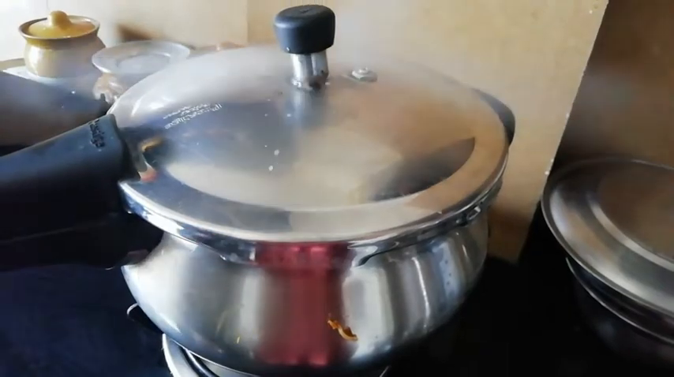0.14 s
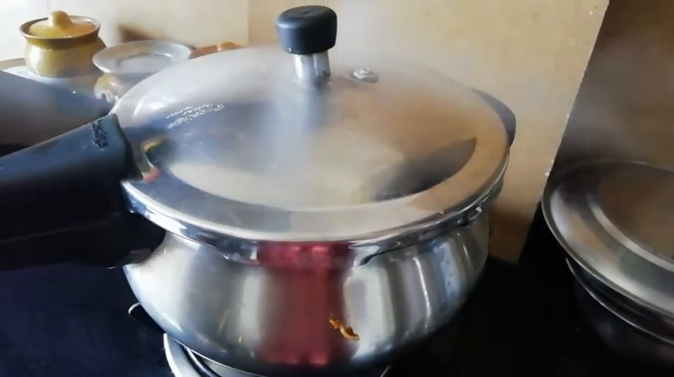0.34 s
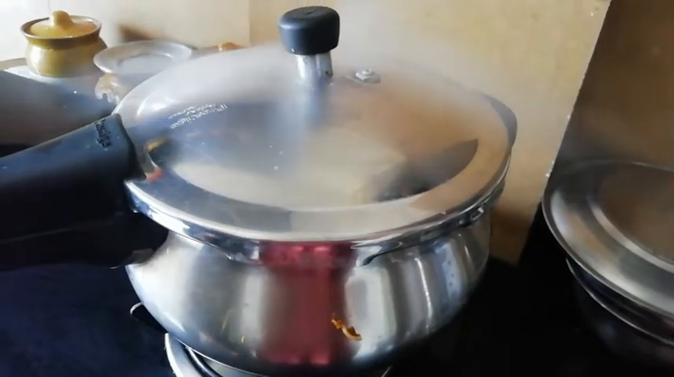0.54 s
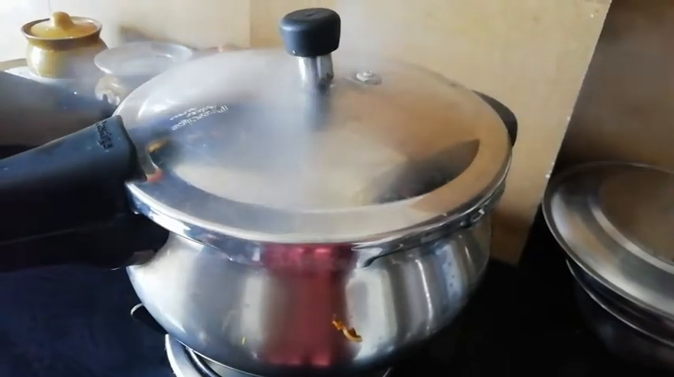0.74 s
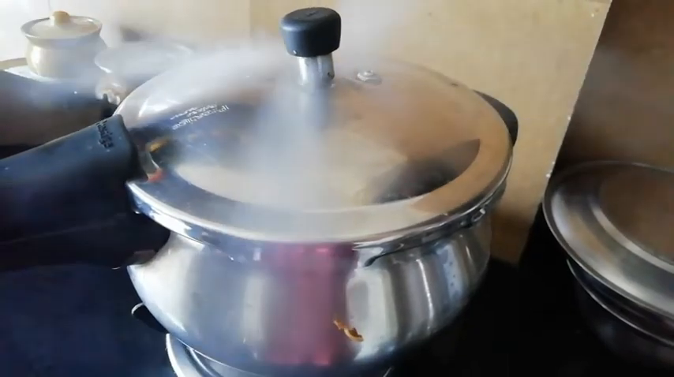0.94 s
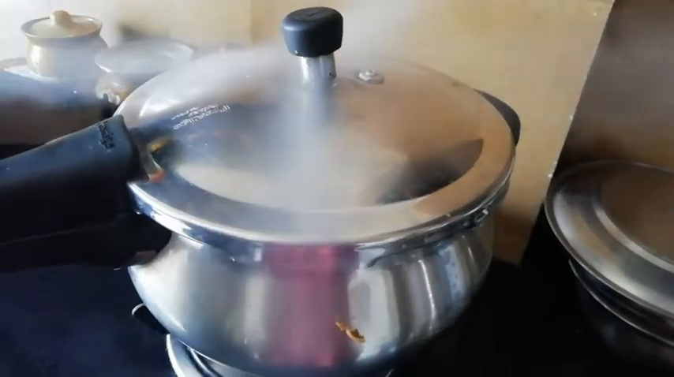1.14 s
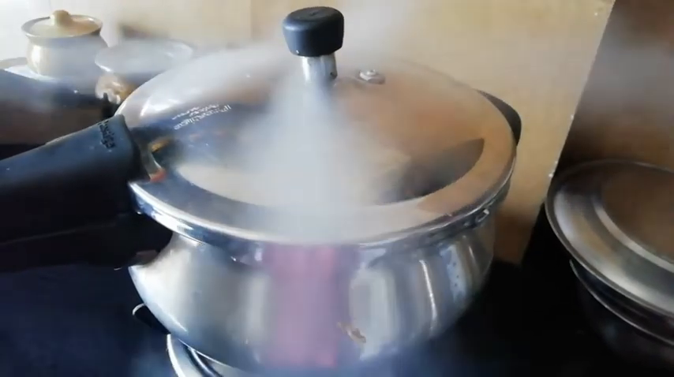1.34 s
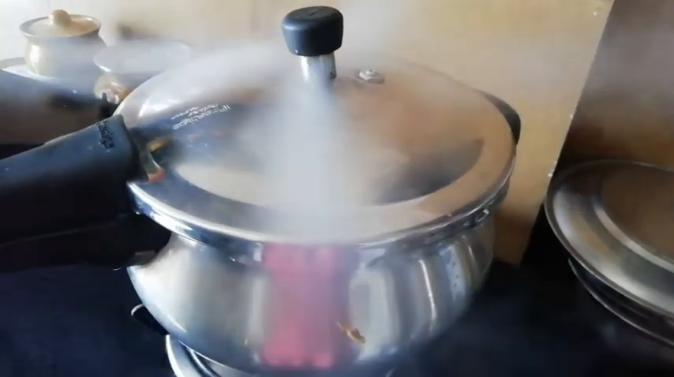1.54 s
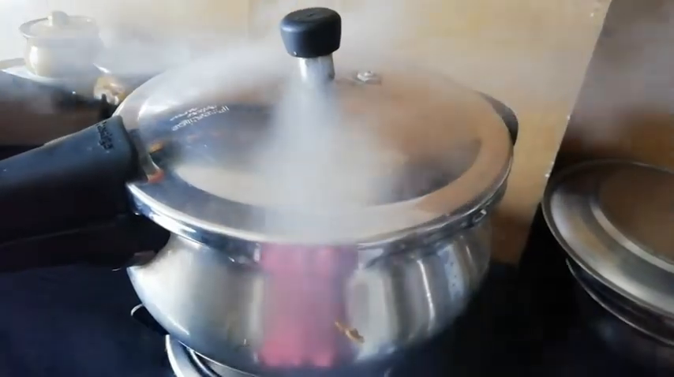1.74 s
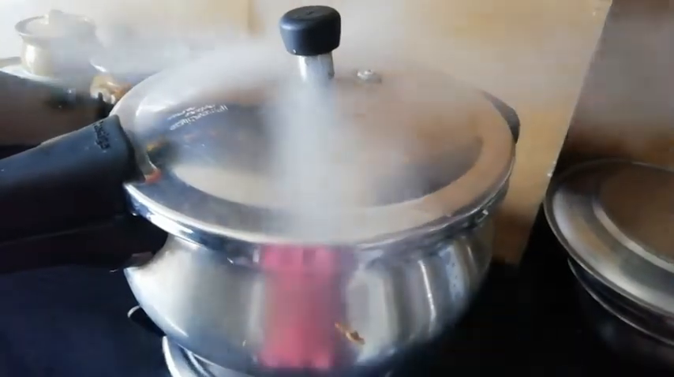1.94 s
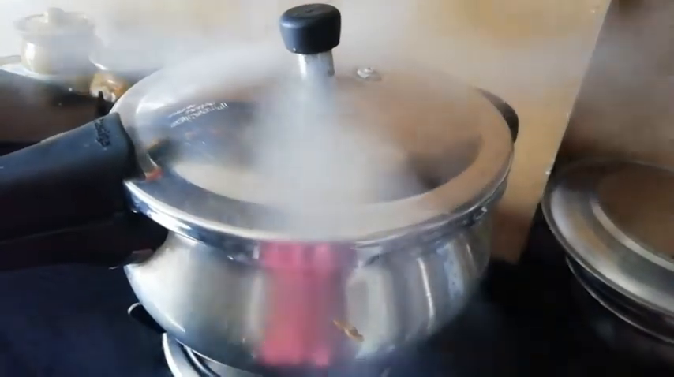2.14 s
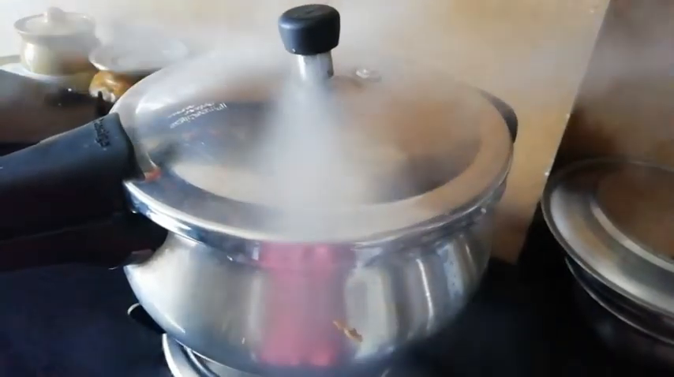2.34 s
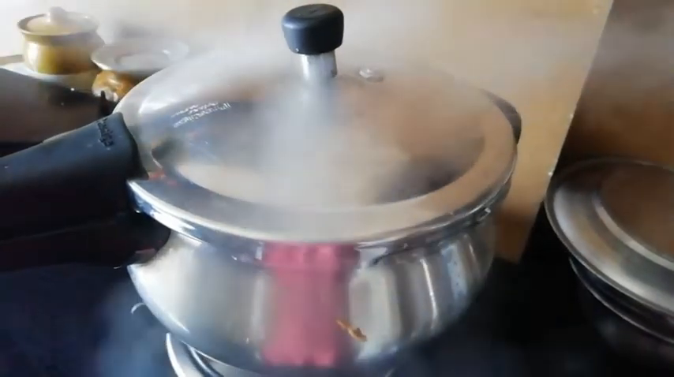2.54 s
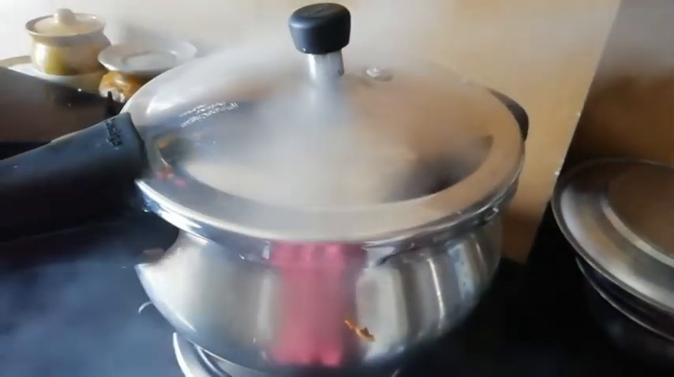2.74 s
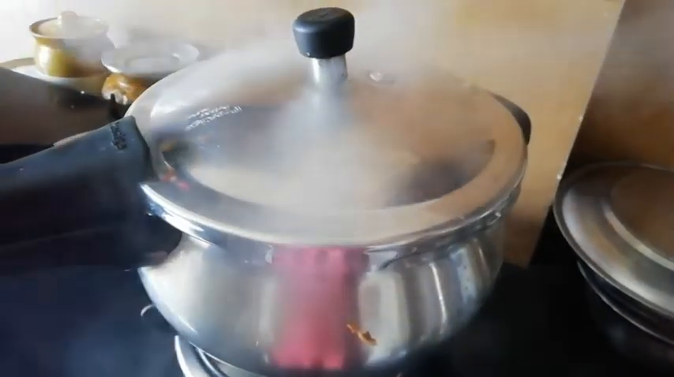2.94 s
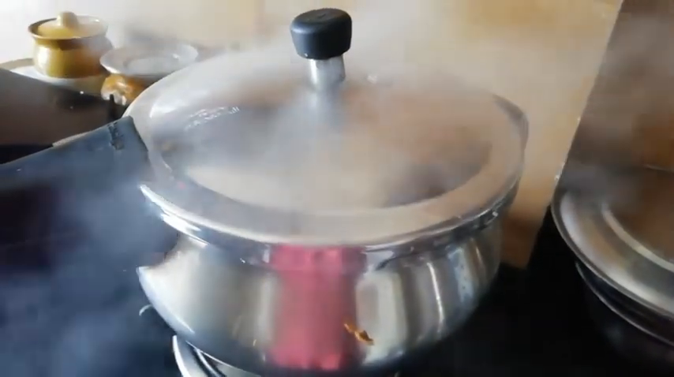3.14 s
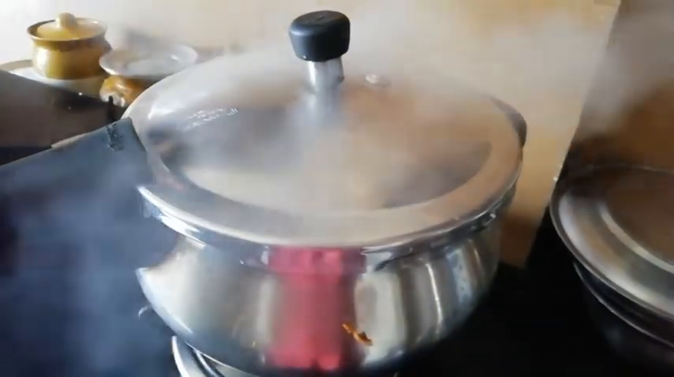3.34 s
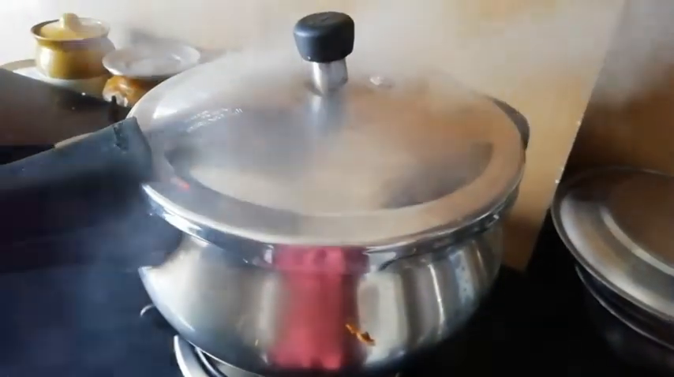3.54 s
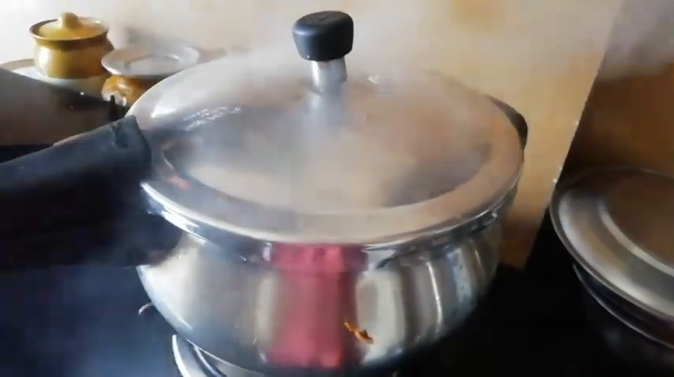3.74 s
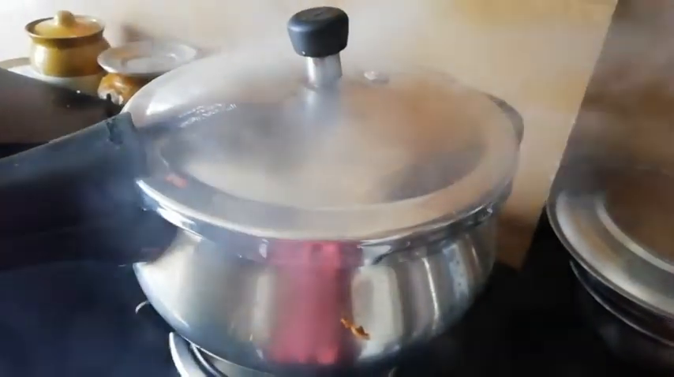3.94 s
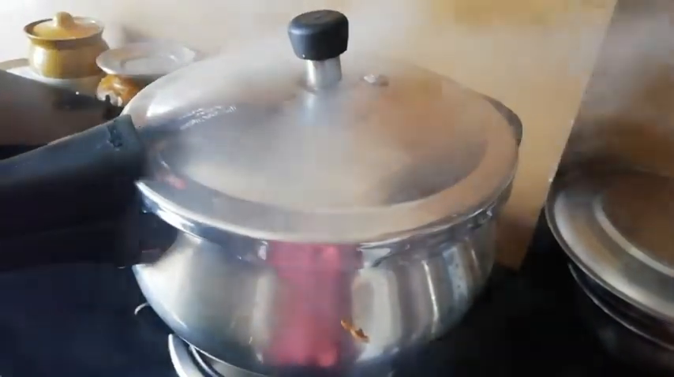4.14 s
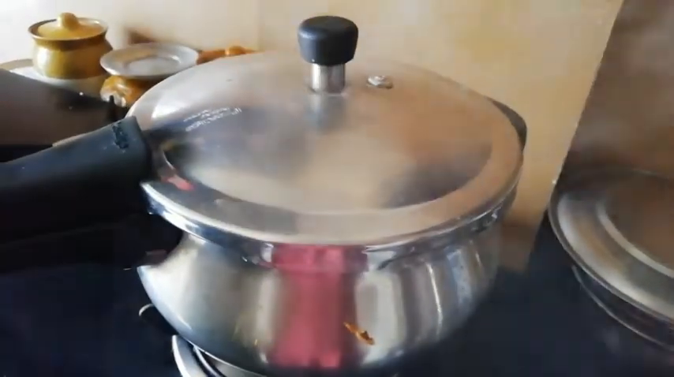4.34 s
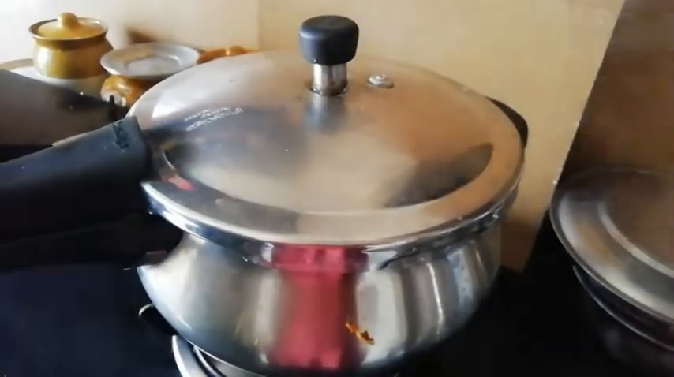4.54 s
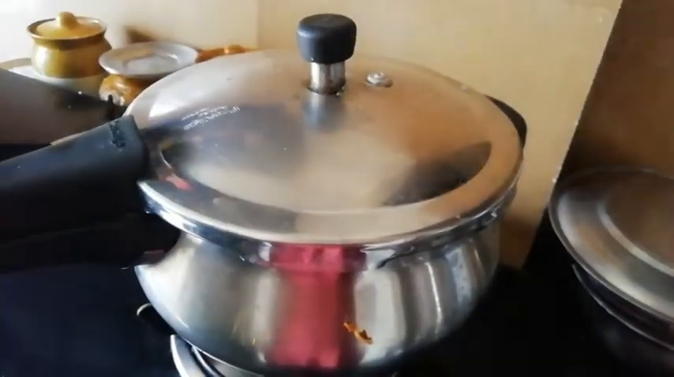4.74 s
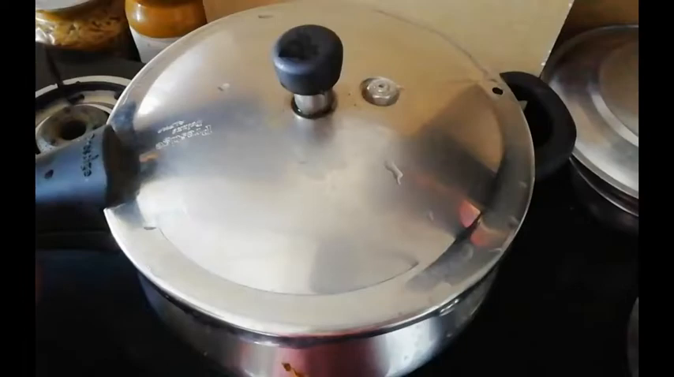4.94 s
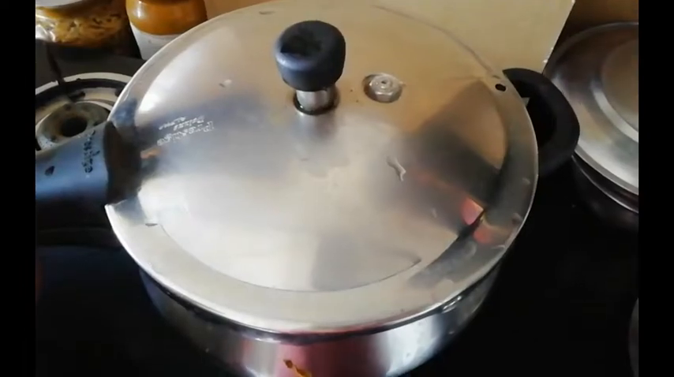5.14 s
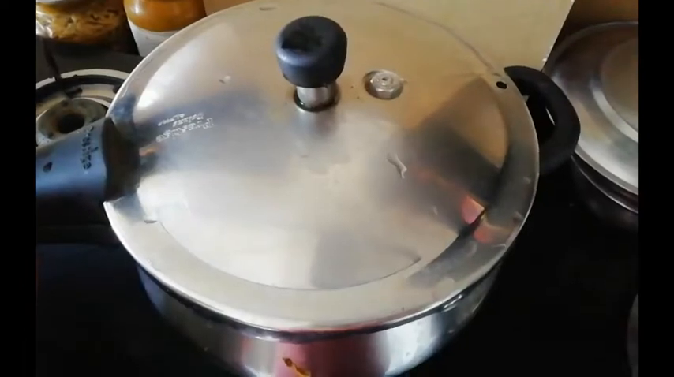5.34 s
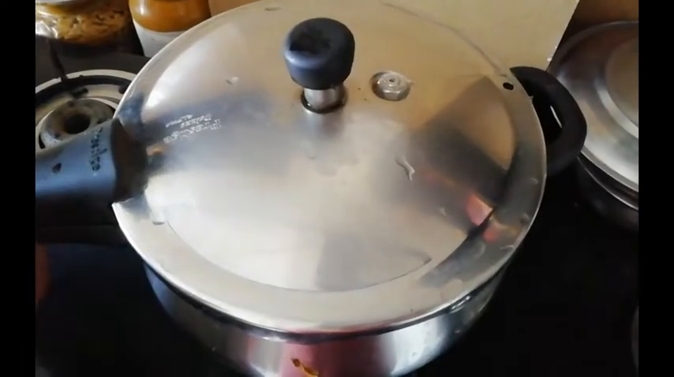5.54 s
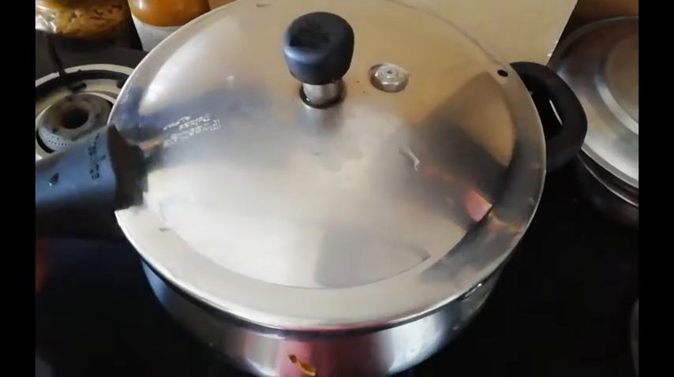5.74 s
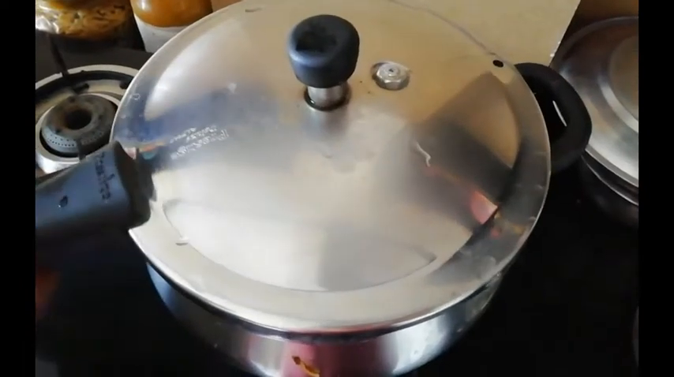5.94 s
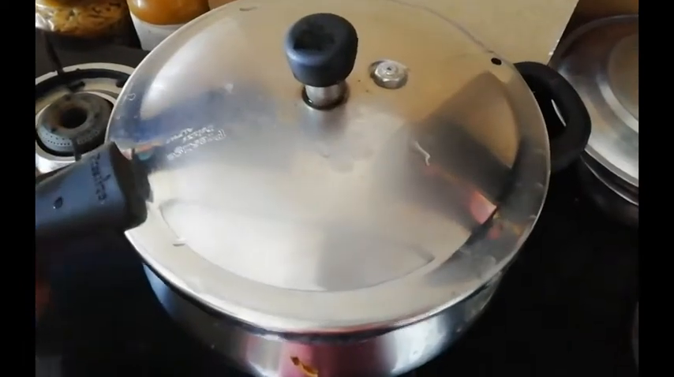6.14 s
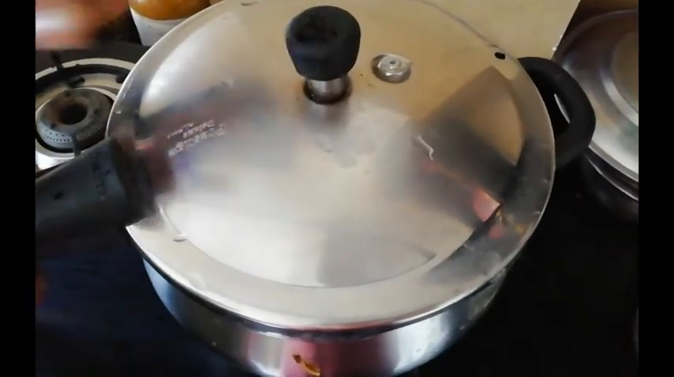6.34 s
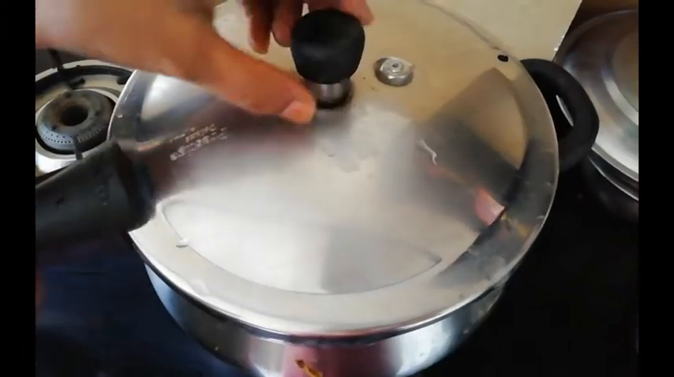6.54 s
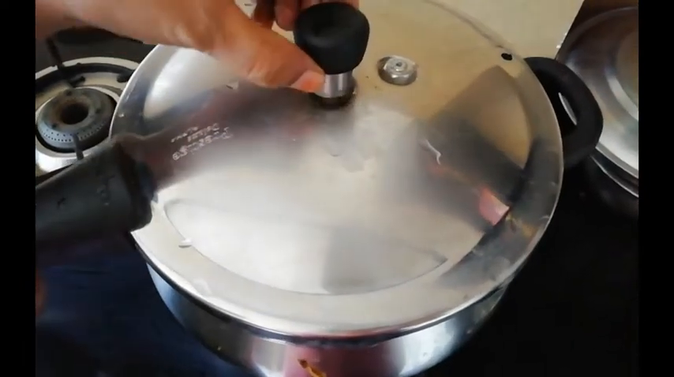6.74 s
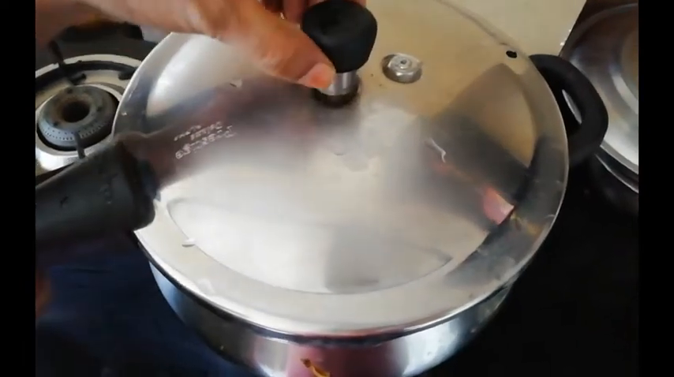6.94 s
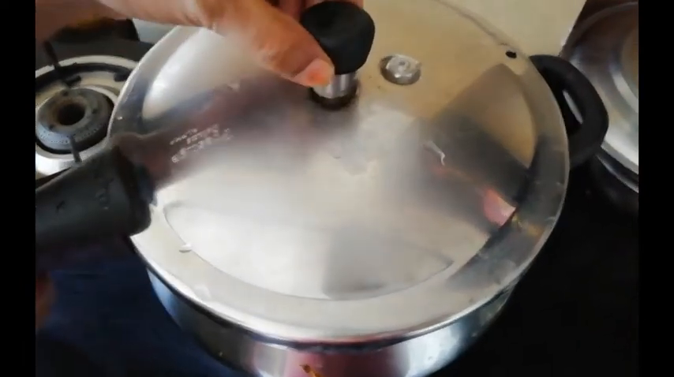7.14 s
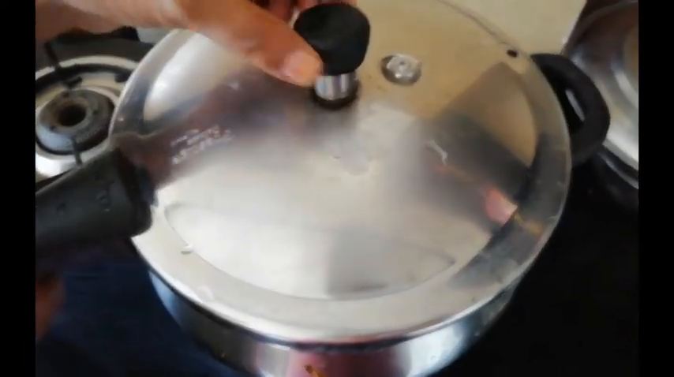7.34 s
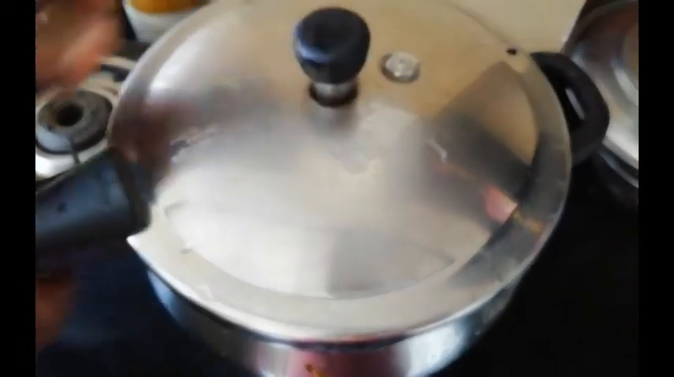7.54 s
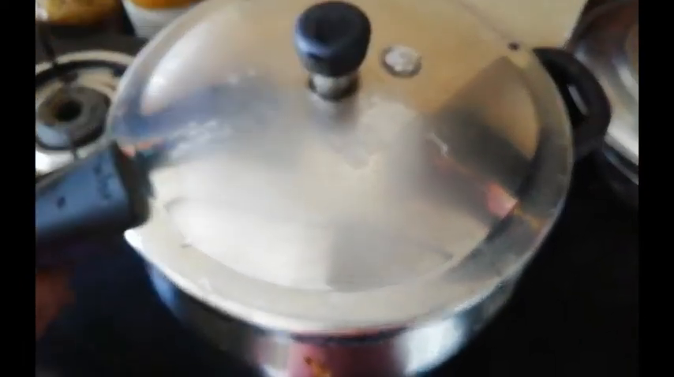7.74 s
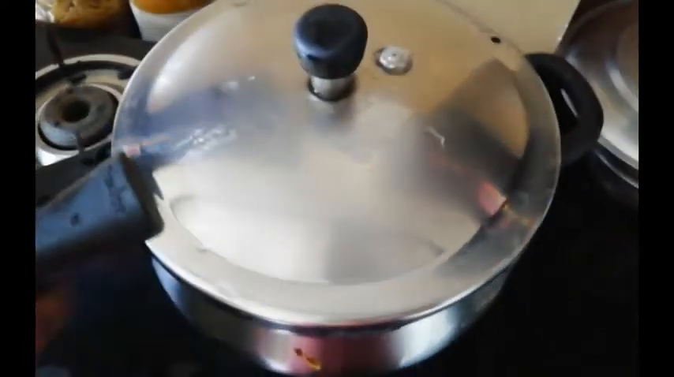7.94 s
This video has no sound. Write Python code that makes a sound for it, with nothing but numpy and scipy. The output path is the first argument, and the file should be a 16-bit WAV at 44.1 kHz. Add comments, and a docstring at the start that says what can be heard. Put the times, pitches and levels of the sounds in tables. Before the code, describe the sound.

In a small kitchen, a pressure cooker blows a loud, piercing steam jet close to a phone, with low wind thuds buffeting it early on. After four seconds the weight rattles down and the hiss dies to a faint seep. A short total silence follows, then soft burner rumble and hum with small knocks. A finger clinks the weight, releases a second brief hiss, and it drops with a ringing clack.

```python
"""Small kitchen: a pressure cooker blows a hard steam jet, band-coloured noise, past its valve weight near a phone.
Eddies buffet the phone's two ports as filtered pulses, each with a faint spit of droplets.
The weight rattles onto its seat as decaying modes and noise cracks; the hiss dies, the shut valve seeps.
After a short silence the burner rumbles as coloured noise over a wavering hum, among knocks and spits.
A finger taps the weight, lifts it for a second short hiss with a breathy whistle, and lets it drop."""
import sys
import numpy as np
from scipy import signal
from scipy.fft import rfft, irfft
from scipy.io import wavfile

SR = 44100
rng = np.random.default_rng(int(sys.argv[2]) if len(sys.argv) > 2 else 0)


def log_audio(samples):
    """Write samples as a 16-bit WAV file to the path given in sys.argv[1]."""
    # one column per channel
    frames = np.atleast_2d(samples).T
    # limit to full scale, then quantise
    limited = np.clip(frames, -1, 1)
    pcm = np.round(limited * 32767).astype(np.int16)
    wavfile.write(sys.argv[1], SR, pcm)


N = 357070
TIME = np.arange(N) / SR
BINS = np.maximum(np.arange(N // 2 + 1) * SR / N, 1)

# burner flame and seeping valve from above the lid: f/Hz, relative left level/dB, relative right level/dB
STOVE_COLOUR = [(35, -20, -16), (65, -4.5, -1.5), (114, -1.5, -2), (186, -15.5, -14.5), (280, -9, -10.5),
                (720, -11.5, -16.5), (1300, -17, -18), (2180, -16.5, -14.5), (2790, -18, -19.5),
                (5840, -20.5, -31.5), (7400, -17, -38), (8900, -9, -34), (10540, -25, -43),
                (13000, -34, -43), (15600, -36, -42.4)]
# hum under the flame: f/Hz, mean level/dB rms
FLAME_HUM = [(63.5, -53.5), (123.8, -46), (243, -56.5), (305, -55)]
# ports share mostly the bass of the kitchen sound: f/Hz, likeness/0-1, right port phase lead/rad
ROOM_COHERENCE = [(65, 0.98, -0.3), (130, .95, 0.5), (297, .65, 0.5), (613, 0.6, -2.5), (1390, 0, -2.5),
                  (2540, 0.31, -3), (8900, 0, -16.5)]
# seated valve seeping after the blow: f/Hz, relative left level/dB, relative right level/dB
SEEP_COLOUR = [(39.9, -18.5, -12), (129.6, -16, -19), (306, -26, -23), (1210, -23, -25.5),
               (3000, -26, -19.5), (5800, -27, -28.5), (7200, -24, -19), (8600, -12.5, -20),
               (10620, -30, -32), (14930, -41.5, -37)]
# small knocks and spits about the stove: t/s, level/dB, centre f/Hz, t60/s, left minus right level/dB
STOVE_TICKS = [(4.647, -41, 3870, .04, -2), (5.362, -38, 1500, .08, 0), (5.674, -35, 1700, .06, 0),
               (5.692, -35, 1300, 0.19, 6), (5.744, -34, 9500, .04, 16), (6.062, -28, 8900, 0.066, 20),
               (6.131, -23, 1330, 0.058, -4), (6.150, -34.5, 2280, 0.22, 0), (7.84, -38, 1500, .1, -4)]
# modes of lid (lowest two), weight and vent pipe:
# f/Hz, relative left level/dB, relative right level/dB, t60/s
WEIGHT_MODES = [(630, -22, -24, .33), (760, -18, -21, .24), (1696, -14, -12, .25), (1846, -22, -18, .2),
                (2073, -20, -13, .2), (2550, -13, -8, .14), (2902, -11, -9, .22), (3047, -2, -1, .2),
                (3106, -2.5, -3.5, .28), (3170, -9, -9, .2), (3390, -10, -11, .22), (3720, -10, -12, .13),
                (4620, -11, -20, .2), (4880, -12, -22, .2), (6020, -20, -36, .15), (8280, -16, -36, .18),
                (8950, -10, -34, .08)]
# blows of the weight on its pipe:
# t/s, relative ring level/dB, extra level of lid modes/dB, relative crack level/dB, crack t60/s
WEIGHT_BLOWS = [(4.193, -25, 10, -30, .05), (4.224, -23, 5.5, -28, .06), (4.238, -33, 4, -31, .05),
                (4.333, -46, 5, -50, .05), (6.488, -24.5, 6, -15.5, 0.056), (6.612, -46, 0, -12.5, 0.02),
                (7.325, -51, 0, -32.5, 0.22), (7.341, -34, -3, -20, 0.084), (7.347, -15, -5, -17, 0.033),
                (7.373, -23, -2, -18.5, 0.1), (7.382, -26, 5, -27, .05), (7.395, -27.5, -2, -30, 0.082)]
# crack of steel on steel: f/Hz, relative left level/dB, relative right level/dB
CRACK_COLOUR = [(60, -24, -28), (280, -15, -0.5), (730, 1.5, -9), (1220, -11.5, -30), (1950, 0, 5),
                (3260, 4, 4), (4730, 2, -18), (6560, 0.5, -24), (8800, 6, -26), (11100, -6, -36),
                (14400, -47, -44)]
# hiss of the lifted valve: f/Hz, relative left level/dB, relative right level/dB
LIFT_HISS_COLOUR = [(300, -58, -45), (826, -21, -28), (1500, -24, -21.5), (2280, -23, -15.5),
                    (3300, -14, -16.5), (3920, -11, -20), (5000, -16.5, -32), (7000, -11.5, -29.2),
                    (8300, -4, -29.3), (8960, 1.5, -24.8), (9700, -3, -28.6), (10900, -17.5, -37),
                    (12800, -27, -46.0), (15000, -32, -39)]
# strongest eddies at the ports: t/s, relative peak level/dB
STRONG_PUFFS = [(.313, -15), (.424, -15.5), (.503, -17.5), (.748, -13.5), (1.434, -19.5), (1.497, -23.5),
                (1.766, -25.5), (1.823, -25), (2.038, -25.5), (2.382, -25), (2.831, -21), (2.977, -22),
                (3.158, -17.5), (4.053, -20.5)]
# jet at the left port: f/Hz, relative level/dB
JET_LEFT_COLOUR = [(400, -33.5), (1000, -30), (1700, -27), (2900, -20), (3300, -15), (4100, -15),
                   (5700, -18), (7500, -10.5), (8700, 0.84), (10600, -11.5), (12000, -13), (14500, -19),
                   (15600, -22)]
# jet at the right port: f/Hz, relative level/dB
JET_RIGHT_COLOUR = [(400, -34), (950, -30), (1800, -28.5), (2800, -9.5), (3900, -10.5), (4600, -10.5),
                    (5900, -13.5), (8350, -3), (8900, -11), (10900, -16), (11700, -10), (13000, -13.5),
                    (15600, -25)]
# likeness of the jet at the two ports: f/Hz, likeness/0-1, right port phase lead/rad
JET_COHERENCE = [(100, 0.5, 0.1), (300, .6, 2.2), (580, 0.91, 2.9), (898, 0.3, 4.34), (1270, 0.98, 6.3),
                 (1780, 0.72, 7.6), (2865, 0, 8.3), (4230, 0.13, 9.97), (5160, 0.44, 12.15),
                 (7270, 0, 13.73), (8700, 0.9, 14.38), (9500, 0.25, 13.57), (11730, 0.7, 14.66),
                 (13180, 0.6, 18.48), (14800, 0.25, 19.12)]
# narrow peaks and dips that finely ridge the jet's colour: f/Hz, width/Hz, lift/dB
JET_RIDGES = [(2800, 158, 3), (4520, 71, 8.5), (4720, 56, 3.5), (4916, 87, 6.5), (6750, 41, 8),
              (7870, 70, 3.5), (7980, 80, 4), (8160, 45, -2), (8280, 38.5, -3), (8200, 34, -3),
              (8700, 92, 3), (9055, 52.4, 5), (9300, 91, 3.5), (9800, 80, 5), (10060, 70, 4.5)]

PAUSE_START_S, PAUSE_END_S = 4.725, 5.059
# levels ahead of flutter
STOVE_DB, SEEP_DB = -36.5, -43.5
# a hand shifts on the phone
RUB_DB, RUB_SWELL_DB_PER_S = -34, 310
# a finger lifts the weight; the hiss dies as it is let down
LIFT_S = 6.611
HISS_DB, HISS_ATTACK_S, HISS_HOLD_S, HISS_FALL_DB_PER_S = -8, 0.099, 0.06, 76.5
# first wet spurt as the seat opens
SPURT_DB, SPURT_ATTACK_S, SPURT_HOLD_S, SPURT_FALL_DB_PER_S = -11.5, 0.016, 0.01, 600
# the gap whistles, joining shortly after the hiss begins
WHISTLE_DB, WHISTLE_DELAY_S = -25, 0.055
WHISTLE_ATTACK_S, WHISTLE_HOLD_S, WHISTLE_FALL_DB_PER_S = 0.03, 0.15, 74
# the plume blows straight at the phone, then veers off and only brushes it
PLUME_DB, VEER_S, VEER_DB_PER_S, BRUSH_DB = -31, 0.71, 32.5, -47.5
# jet bands ahead of wander: roar, the valve's tone band, fizz above it
ROAR_DB, TONE_DB, FIZZ_DB = -20.5, -16.5, -21.5
# fizz grows through the blow; as the pressure sags, roar and fizz lose level
FIZZ_GROWTH_DB_PER_S, SAG_FROM_S, SAG_DB_PER_S = 1.06, 2.93, 2
# the weight sinks and shuts the jet over a soft knee; the tone outlasts the rest
SHUT_S, SHUT_KNEE_S, SHUT_DB_PER_S, TONE_LINGERS_S = 4.126, 0.018, 138, 0.077
# the phone's gain control and top cut
CEILING_DB, DETECT_S, RECOVER_DB_PER_S, TOP_HZ = -9.5, 0.0087, 35.5, 15650


def amp(db):
    """Decibels to gain."""
    return 10 ** (np.asarray(db) / 20)


def across(table):
    """Every column of a frequency table at every bin, over log frequency."""
    hz, *columns = np.transpose(table)
    return np.array([np.interp(np.log(BINS), np.log(hz), c) for c in columns])


def unit(x):
    """Scale so that the mean of the channels has rms 1."""
    return x / np.std(np.atleast_2d(x).mean(axis=0))


def resonance(hz, width_hz):
    """Complex gain of a band-pass at every bin."""
    return 1 / (1 + 1j * (BINS / hz - hz / BINS) * hz / width_hz)


def below(hz):
    """Gain of a steep low-pass at every bin."""
    return 1 / (1 + (BINS / hz) ** 16)


def pan(db):
    """Left and right gains for a level difference."""
    return amp(np.array([[db], [-db]]) / 2)


def walk(rate_hz):
    """Smooth random wander with spread 1."""
    x = irfft(rfft(rng.standard_normal(N)) / (1 + (BINS / rate_hz) ** 4), N)
    return x / x.std()


def noise(gain, ports):
    """Coloured noise at two ports that hear partly the same air."""
    likeness, lead_rad = across(ports)
    likeness = np.clip(likeness, 0, 1)
    left, own = rfft(rng.standard_normal((2, N)))
    mixed = likeness * left + np.sqrt(1 - likeness ** 2) * own
    right = mixed * np.exp(1j * lead_rad)
    return unit(irfft(np.array([left, right]) * gain, N))


def echoes(x, t60_s, db):
    """Add a dense tail of reflections, different at each port."""
    t = TIME[:SR // 2]
    tail = rng.standard_normal((2, len(t))) * np.exp(-np.log(1000) * t / t60_s)
    tail *= amp(db) / np.sqrt(np.sum(tail ** 2, axis=1, keepdims=True))
    return x + signal.fftconvolve(x, tail, axes=1)[:, :N]


def since(start_s):
    """Seconds since a moment, zero before it."""
    return np.maximum(TIME - start_s, 0)


def fade(start_s, t60_s):
    """Sudden start and exponential decay."""
    return (TIME >= start_s) * np.exp(-np.log(1000) * np.clip((TIME - start_s) / t60_s, 0, 10))


def envelope(start_s, attack_s, hold_s, fall_db_per_s):
    """Straight rise, hold, then a steady fall in decibels."""
    rise = np.minimum(since(start_s) / attack_s, 1)
    return rise * amp(-fall_db_per_s * since(start_s + attack_s + hold_s))


def shutting(start_s):
    """Gain of the flow as the weight sinks onto its seat."""
    knee = np.logaddexp(0, (TIME - start_s) / SHUT_KNEE_S)
    return amp(-SHUT_DB_PER_S * SHUT_KNEE_S * knee)


def push(hits):
    """An eddy presses on the port for a few milliseconds and lets go."""
    return irfft(rfft(hits) * resonance(44, 130) / (1 + 1j * BINS / 420) ** 2, N)


def stove():
    """The flame flutters in the bass over a wavering hum while the valve keeps seeping."""
    air = noise(amp(across(STOVE_COLOUR)), ROOM_COHERENCE) * amp(STOVE_DB)
    flame = irfft(rfft(air) / (1 + (BINS / 500) ** 4), N)
    seep = air - flame
    fluttering = flame * amp(-3.0 + 2.7 * walk(11)) + seep * amp(1.2 * walk(12))
    hum = np.zeros(N)
    for hz, db in FLAME_HUM:
        level = amp(db + 2 * walk(5.5)) * np.sqrt(2)
        cycles = np.cumsum(hz + 2.62 * walk(5)) / SR
        hum += level * np.sin(2 * np.pi * cycles)
    return (fluttering + hum) * (TIME > PAUSE_END_S)


def simmer():
    """The seated valve seeps as coloured noise; a hand rubs the phone, swelling up to the pause."""
    seep = noise(amp(across(SEEP_COLOUR)), ROOM_COHERENCE) * amp(SEEP_DB + 0.5 * walk(10))
    swell_db = RUB_DB - RUB_SWELL_DB_PER_S * np.abs(TIME - PAUSE_START_S)
    rub = noise(resonance(210, 220) ** 2, ROOM_COHERENCE) * amp(swell_db)
    return (seep + rub) * (TIME < PAUSE_START_S)


def thump(db=-21.0, t60_s=1.0):
    """A soft low thump as the sound comes back: a smoothed, decaying step."""
    swing = np.cos(2 * np.pi * 0.95 * (TIME - PAUSE_END_S))
    step = -amp(db) * fade(PAUSE_END_S, t60_s) * swing
    return irfft(rfft(step) / (1 + 1j * BINS / 600), N)


def ticks():
    """Short dull knocks and bright spits of water: decaying band noise."""
    out = np.zeros((2, N))
    for start_s, db, hz, t60_s, side_db in STOVE_TICKS:
        burst = noise(resonance(hz, 1370) ** 2 * pan(side_db), ROOM_COHERENCE)
        out += burst * amp(db) * fade(start_s, t60_s)
    return out


def weight():
    """Each blow cracks and rings the steel weight, its pipe and, to a varying degree, the lid."""
    crack = noise(amp(across(CRACK_COLOUR)), ROOM_COHERENCE)
    out, t = np.zeros((2, N)), TIME[:SR // 2]
    for start_s, ring_db, lid_db, crack_db, crack_t60_s in WEIGHT_BLOWS:
        out += crack * amp(crack_db) * fade(start_s, crack_t60_s)
        i = int(start_s * SR)
        for hz, left_db, right_db, t60_s in WEIGHT_MODES:
            # pitch shifts a little with how the weight sits
            shifted_hz = hz * (1 + 0.004 * rng.standard_normal())
            cycles = shifted_hz * t + rng.random((2, 1)) / 2
            ring = np.sin(2 * np.pi * cycles) * np.exp(-np.log(1000) * t / t60_s)
            db = ring_db + lid_db * (hz < 1000)
            out[:, i:i + len(t)] += amp(db + np.array([[left_db], [right_db]])) * ring
    return out


def lifted_valve():
    """Steam through the opened seat: wet spurt, unsteady hiss and the narrow gap's breathy whistle."""
    hiss = echoes(noise(amp(across(LIFT_HISS_COLOUR)), ROOM_COHERENCE), t60_s=0.063, db=-11.0)
    hiss = unit(hiss) * amp(HISS_DB + 0.37 * walk(70))
    spurt = noise(resonance(5700, 1750) ** 2 * pan(19), ROOM_COHERENCE) * amp(SPURT_DB)
    whistle = noise(resonance(3905, 310) ** 2 * pan(11), ROOM_COHERENCE)
    whistle *= amp(WHISTLE_DB + 2.3 * walk(60))
    hiss *= envelope(LIFT_S, HISS_ATTACK_S, HISS_HOLD_S, HISS_FALL_DB_PER_S)
    spurt *= envelope(LIFT_S, SPURT_ATTACK_S, SPURT_HOLD_S, SPURT_FALL_DB_PER_S)
    whistle *= envelope(LIFT_S + WHISTLE_DELAY_S, WHISTLE_ATTACK_S, WHISTLE_HOLD_S,
                        WHISTLE_FALL_DB_PER_S)
    return hiss + spurt + whistle


def buffeting(hits_per_s=170, spread_db=5.0, puff_db=-1, spit_db=-10.5, port_lag_s=0.00077, gust_db=1.5):
    """Small eddies and a few strong puffs hit the left port, then the right, with a faint droplet spit."""
    plume = amp(PLUME_DB - VEER_DB_PER_S * since(VEER_S)) + amp(BRUSH_DB + gust_db * walk(4))
    strength = amp(spread_db * np.clip(rng.standard_normal(N), -2, 1.3))
    hits = (rng.random(N) < hits_per_s / SR) * strength
    hits = hits / push(hits).std() * plume * shutting(SHUT_S)
    single_peak = push(TIME == 0).max()
    for start_s, db in STRONG_PUFFS:
        hits[int(start_s * SR)] += amp(db + puff_db) / single_peak
    spit = irfft(rfft(hits) * resonance(850, 870) ** 2, N)
    thuds = push(hits)
    left = thuds + amp(spit_db) * thuds.std() * unit(spit)
    right = np.interp(TIME - port_lag_s, TIME, left)
    return np.array([left, right])


def jet():
    """Turbulent steam with finely ridged colour; as the weight sinks, roar and fizz fail before the tone."""
    ridges_db = sum(db * np.abs(resonance(hz, width_hz)) ** 2 for hz, width_hz, db in JET_RIDGES)
    colour = amp(np.vstack([across(JET_LEFT_COLOUR), across(JET_RIGHT_COLOUR)]) + ridges_db)
    hiss = rfft(echoes(noise(colour, JET_COHERENCE), t60_s=0.16, db=-11.5))
    sag_db = SAG_DB_PER_S * since(SAG_FROM_S)
    roar = unit(irfft(hiss * below(6180), N))
    roar *= amp(ROAR_DB - sag_db + 0.78 * walk(25))
    tone = unit(irfft(hiss * (below(9400) - below(6430)), N))
    tone *= amp(TONE_DB + 0.5 * walk(22))
    fizz = unit(irfft(hiss * (1 - below(9830)), N))
    fizz *= amp(FIZZ_DB + FIZZ_GROWTH_DB_PER_S * TIME - sag_db + 0.8 * walk(20.3))
    steam = (roar + fizz) * shutting(SHUT_S) + tone * shutting(SHUT_S + TONE_LINGERS_S)
    return steam * amp(0.32 * walk(9))


def gain_control(x):
    """Turn both channels down when the louder one passes the ceiling, then recover steadily."""
    keep = np.exp(-1 / (DETECT_S * SR))
    power = signal.lfilter([1 - keep], [1, -keep], x ** 2, axis=1).max(axis=0)
    over_db = 10 * np.log10(np.maximum(power / amp(CEILING_DB) ** 2, 1))
    recovered_db = RECOVER_DB_PER_S * TIME
    # running maximum holds each cut while it recovers
    cut_db = np.maximum.accumulate(over_db + recovered_db) - recovered_db
    return x * amp(-cut_db)


def scene():
    """Steam, stove and valve weight in a small kitchen."""
    knocks = echoes(weight() + ticks(), t60_s=0.28, db=-8.5)
    return stove() + simmer() + thump() + knocks + lifted_valve() + buffeting() + jet()


def record(dry):
    """The phone rides its gain, rounds the highest peaks, is silent in the pause and cuts the top."""
    running = (TIME < PAUSE_START_S) | (TIME > PAUSE_END_S)
    rounded = 2 * np.tanh(gain_control(dry) / 2)
    top_cut = signal.ellip(10, 0.1, 70, TOP_HZ, fs=SR, output="sos")
    return signal.sosfilt(top_cut, rounded * running)


dry = scene()
out = record(dry)
log_audio(out)
```